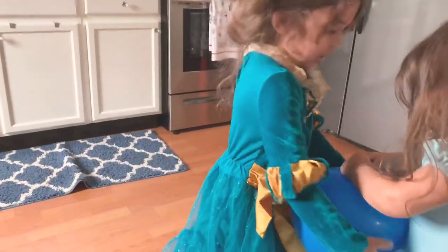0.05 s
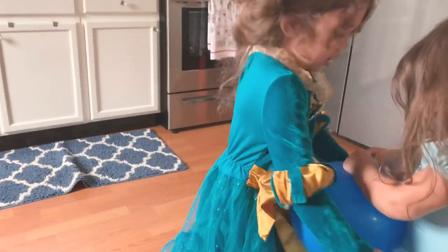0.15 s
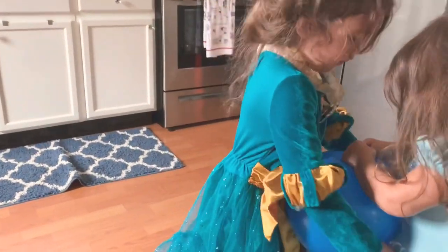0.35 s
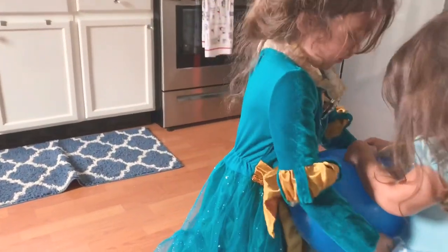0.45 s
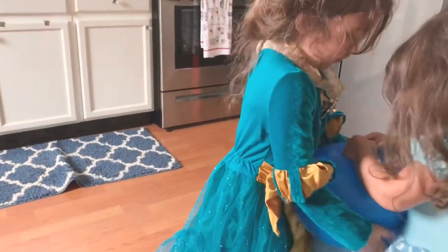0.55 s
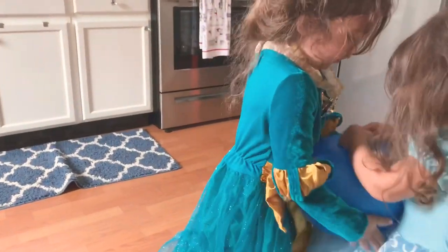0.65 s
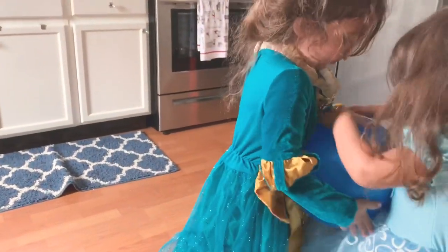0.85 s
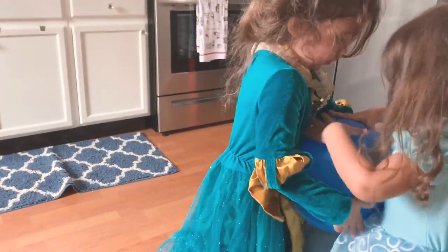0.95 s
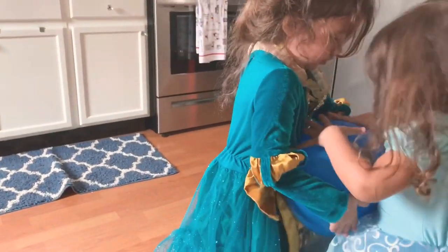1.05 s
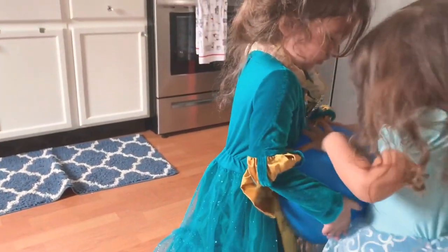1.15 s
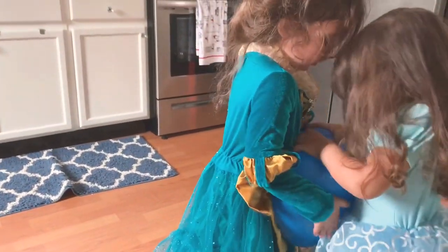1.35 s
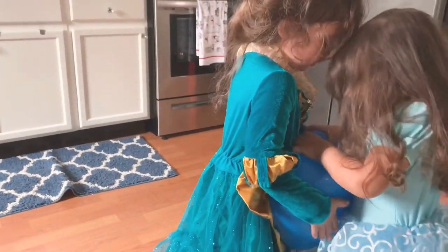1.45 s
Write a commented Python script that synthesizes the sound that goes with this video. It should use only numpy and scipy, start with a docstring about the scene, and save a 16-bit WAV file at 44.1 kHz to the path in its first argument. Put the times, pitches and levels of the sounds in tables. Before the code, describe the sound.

A rubber balloon is squeezed and pushed by hands in a hard kitchen: a strong hollow boom with a stuttering rub early, then sharp snaps, smaller thuds and faint scuffs over rustling cloth, picked up close in stereo.

```python
"""A rubber balloon is squeezed and pushed between hands in a hard kitchen.
Its skin shudders in runs of random slips through skin modes; low modes swell and die as booms;
snaps of rubber letting go and longer scuffs are band-passed noise bursts; noise grains make cloth rustle.
Feet and knees rumble in low noise under a faint hiss; decaying noise tails are the room's answer."""
import sys
import numpy as np
from scipy import signal
from scipy.fft import rfft, irfft, next_fast_len
from scipy.io import wavfile
from scipy.ndimage import map_coordinates

SR = 44100
rng = np.random.default_rng(int(sys.argv[2]) if len(sys.argv) > 2 else 0)


def log_audio(samples):
    """Write samples as a 16-bit WAV file to the path given in sys.argv[1]."""
    # one column per channel
    frames = np.atleast_2d(samples).T
    # limit to full scale, then quantise
    limited = np.clip(frames, -1, 1)
    pcm = np.round(limited * 32767).astype(np.int16)
    wavfile.write(sys.argv[1], SR, pcm)


N = 66150

# hiss spectrum: f/Hz, gain/dB
HISS_SPECTRUM = [(1500, -40), (3000, 0.5), (7400, -22), (8600, -16.5), (9700, 9.5), (16000, -7.5)]
HISS_DB = -65.5

# floor rumble level: t/s, level/dB
RUMBLE_LEVEL = [(0.0, -34), (0.146, -48), (0.304, -33.5), (0.422, -39), (0.576, -41), (0.714, -49),
                (0.934, -42), (1.214, -51.5), (1.5, -49.5)]
# floor rumble spectrum: f/Hz, gain/dB
FLOOR_SPECTRUM = [(15, -62), (25, -8), (76, 2), (97, -3.5), (300, -14), (321, -7), (945, -29.5),
                  (1500, -24), (1950, -23.5), (3300, -120)]

# rustle level: t/s, level/dB
RUSTLE_LEVEL = [(0.0, -36.5), (0.05, -46), (0.1, -47), (0.19, -53), (0.33, -51), (0.44, -53), (0.49, -40),
                (0.56, -49.5), (0.65, -46.5), (0.68, -37), (0.76, -42), (0.83, -45.5), (0.91, -56.5),
                (0.96, -48.5), (1.09, -57), (1.13, -53.5), (1.18, -60.5), (1.23, -52.5), (1.26, -48.5),
                (1.36, -63.5), (1.43, -51), (1.5, -44)]
# rustle spectrum, cloth body down to a deep gap; the last row is not used: f/Hz, gain/dB
RUSTLE_SPECTRUM = [(240, 19), (400, 3.5), (776, 7.5), (899, 9.5), (1130, 4), (3960, 0.5), (7500, 1.5),
                   (9750, -70), (16500, -120)]
# rustle spectrum, top above the gap: f/Hz, gain/dB
RUSTLE_TOP_SPECTRUM = [(10000, 0), (12500, -4.5), (16000, -1.5)]
TOP_SWING = 0.47  # extra dB in the top per dB of rustle level

# snaps of rubber letting go and longer scuffs:
# t/s, peak level/dB, centre f/Hz, decay time constant/s, treble gain/dB
SNAP_AND_SCUFF_EVENTS = [(0.081, -23, 2400, 0.0023, -16), (0.21, -19, 1250, 0.0026, -67),
                         (0.4572, -23.5, 1570, 0.0053, -28), (0.4716, -19, 2240, 0.0019, -17),
                         (0.6623, -8.5, 1560, 0.002, -16), (0.694, -27.5, 3800, 0.013, -39),
                         (0.736, -31, 3630, 0.0089, -35), (0.748, -21.5, 4000, 0.0076, -23),
                         (0.829, -26, 1310, 0.0032, -22), (0.958, -36.5, 4050, 0.0054, -24),
                         (1.022, -36, 2950, 0.01, -8), (1.103, -35, 4300, 0.007, -26),
                         (1.126, -32, 1130, 0.0021, -15), (1.204, -42.5, 2310, 0.001, -21),
                         (1.238, -36.5, 4130, 0.003, -24), (1.2485, -27, 3200, 0.0027, -32),
                         (1.255, -30, 4300, 0.0076, -29), (1.448, -36, 3800, 0.0036, -40),
                         (1.4609, -21.5, 1500, 0.0013, -18), (1.4641, -19.5, 4120, 0.0016, -36)]
# snap and scuff treble resonances: f/Hz, width/Hz, gain/dB
SNAP_TREBLE_MODES = [(4600, 2500, 2), (12500, 8000, 2)]
SNAP_WIDTH_RATIO = 1.2  # bandwidth / centre
SNAP_RISE_RATIO, SNAP_CLICK = 0.3, 3  # rise / decay time constant; first click / grain size

# booms: t/s, level/dB, strongest pitch/octaves over lowest mode, spread/octaves, t60/s, swell/s
BOOM_EVENTS = [(0.0, -33.5, 0, 0.35, 0.2, 0.0036), (0.09, -32, 1.1, 0.27, 0.12, 0.0064),
               (0.2131, -14, 1.3, 0.26, 0.17, 0.002), (0.215, -10.5, 0.2, 0.42, 0.23, 0.0055),
               (0.214, -21, 2.05, 0.33, 0.16, 0.0031), (0.239, -16.5, 1.5, 0.38, 0.24, 0.0039),
               (0.473, -13.5, 0.98, 0.42, 0.098, 0.0038), (0.476, -24.5, 1.66, 0.3, 0.15, 0.0038),
               (0.579, -31, -0.1, 0.48, 0.21, 0.017), (0.663, -26.5, 1.94, 0.53, 0.063, 0.00079),
               (0.666, -20, 0.29, 0.39, 0.1, 0.0036), (0.748, -27, -0.06, 0.27, 0.16, 0.0076),
               (0.826, -19, 0.7, 0.39, 0.058, 0.0013), (0.842, -16, 0.46, 0.42, 0.11, 0.004),
               (0.96, -27.5, 0.82, 0.36, 0.25, 0.0052), (1.033, -38.5, 0.6, 0.7, 0.17, 0.0044),
               (1.118, -32, 0.35, 0.88, 0.15, 0.0036), (1.155, -34, 0.02, 0.24, 0.16, 0.01),
               (1.249, -31.5, 0.5, 0.57, 0.12, 0.0031), (1.462, -28.5, 2, 0.49, 0.068, 0.0012)]
# low balloon modes: f/Hz, level/dB
LOW_BALLOON_MODES = [(98, 7.5), (136, 3), (162, 0), (236, 6), (272, 1.5), (299, 2.5), (360, 0), (430, -4.5)]
MODE_SCATTER_RATIO, MODE_SCATTER_DB = 0.015, 2.5  # pitch, level: standard deviations

# skin shudders: t/s, level/dB, length before release/s, brightness f/Hz
SHUDDER_EVENTS = [(0.0, -42, 0.043, 836), (0.087, -34, 0.0041, 820), (0.2, -29, 0.013, 1310),
                  (0.21, -12, 0.011, 1296), (0.224, -17, 0.039, 823), (0.4686, -28, 0.0063, 1870),
                  (0.476, -24, 0.017, 2020), (0.656, -42, 0.0034, 2440), (0.663, -22.5, 0.0028, 1520),
                  (0.747, -32.5, 0.0064, 864), (0.826, -33, 0.008, 480), (0.839, -30.5, 0.0097, 452),
                  (0.958, -42, 0.0068, 624), (1.019, -41.5, 0.0094, 960), (1.045, -48, 0.0021, 850),
                  (1.104, -44.5, 0.0093, 1310), (1.127, -42, 0.0093, 1100), (1.252, -43.5, 0.018, 1040),
                  (1.459, -35, 0.012, 640)]
# skin modes: f/Hz, level/dB
SKIN_MODES = [(571, -0.5), (680, -7), (800, -3.5), (1030, -4), (1180, -0.5), (1360, 0), (1530, -1.5),
              (1880, -4), (2220, -5.5), (2560, -2.5)]
ATTACK_S, RELEASE_T60_S, SLIPS_PER_S, SLIP_SPREAD_DB = 0.00069, 0.042, 1500, 3.5
RING_DB = 2  # modes over bare slips
SKIN_WIDTH_RATIO, SKIN_DETUNE_RATIO = 0.05, 0.02  # bandwidth / pitch; detuning per grip
LOW_EDGE_RATIO, SOFT_TOP_RATIO = 0.36, 2.39  # edges / brightness
SOFT_TOP_DAMPING = 1.39

# room decay: f/Hz, t60/s
KITCHEN_T60 = [(100, 0.13), (400, 0.34), (1500, 0.27), (4000, 0.28), (12000, 0.082)]
# left-right correlation of room and rumble: f/Hz, likeness/1
STEREO_LIKENESS = [(100, 0.96), (300, 0.96), (700, 0), (1500, 0), (4000, 0.52), (9000, 0.18),
                   (14000, 0.021)]
# phase between ports: f/Hz, left lead/rad
PORT_PHASE = [(0, 0.5), (1000, 0.1), (4500, -1.26), (8000, -3), (12600, -8), (16500, -11)]
# phase between ports for the shudders: f/Hz, left lead/rad
SHUDDER_PORT_PHASE = [(0, 0), (2500, 4), (5000, 11)]
SHUDDER_WET_DB, BOOM_WET_DB, SNAP_WET_DB, CLOTH_WET_DB = -4.5, -9, -7, 1
LEFT_OVER_RIGHT_DB = -0.67
TAIL_REDRAW_S = 0.06  # interval between new echo tails

MIC_LOW_HZ, MIC_TOP_HZ = 54, 16400
CLIP_TOP, CLIP_KNEE = 0.95, 4  # full scale; sharpness


def amp(db):
    """Decibels to amplitude."""
    return 10 ** (np.asarray(db) / 20)


def unit(x):
    """x at unit RMS."""
    return x / np.sqrt(np.mean(x ** 2) + 1e-20)


def along(points, hz):
    """(Hz, value) points interpolated on a log axis."""
    f, v = np.transpose(points)
    return np.interp(np.log(hz + 1), np.log(f + 1), v)


def curve(rows):
    """(s, value) rows interpolated to one value per sample."""
    return np.interp(np.arange(N) / SR, *np.transpose(rows))


def wobble(rate_hz):
    """A smooth random curve with rate_hz knots a second."""
    knots = rng.standard_normal(int(N * rate_hz / SR) + 4)
    return map_coordinates(knots, [np.arange(N) * rate_hz / SR])


def filtered(x, response):
    """x through a complex frequency response, zero-padded."""
    n = x.shape[-1]
    m = next_fast_len(n + SR // 2)
    return irfft(rfft(x, m) * response(np.fft.rfftfreq(m, 1 / SR)), m)[..., :n]


def peak(f, hz, width_hz):
    """Response of a causal resonance with unit gain at hz."""
    return 1j * f * width_hz / (hz * hz - f * f + 1j * f * width_hz)


def pair(x):
    """Two unrelated signals mixed to the stereo likeness of each frequency."""
    def mid_side_gains(hz):
        angle = np.arccos(np.clip(along(STEREO_LIKENESS, hz), -1, 1)) / 2
        return np.array([np.cos(angle), np.sin(angle)])

    mid, side = filtered(x, mid_side_gains)
    return np.array([mid + side, mid - side])


def add(track, t_s, x):
    """Adds x to the track at t_s."""
    i = max(round(t_s * SR), 0)
    track[i:i + len(x)] += x[:N - i]


def kitchen(x, wet_db, port_phase):
    """Echo tails decay per frequency, redrawn at regular intervals; two ports differ in phase and level."""
    hop = round(TAIL_REDRAW_S * SR)
    pieces = np.pad(x, (200, -(N + 200) % hop)).reshape(-1, 1, hop)  # 200 samples of echo delay
    noise = rng.standard_normal((len(pieces), 2, SR // 3))
    hz, t, z = signal.stft(noise, SR, nperseg=256)
    decay = amp(-60 * t / along(KITCHEN_T60, hz)[:, None])
    tails = signal.istft(z * decay, SR, nperseg=256)[1]
    tails = tails / np.linalg.norm(tails, axis=2, keepdims=True)
    wet = np.zeros((2, N))
    for k, echo in enumerate(signal.fftconvolve(pieces, tails, axes=2)):
        add(wet.T, k * hop / SR, echo.T)
    side = np.array([[0.5], [-0.5]])  # left, right

    def ports(f):
        lead_rad = np.interp(f, *np.transpose(port_phase))
        return amp(LEFT_OVER_RIGHT_DB * side) * np.exp(1j * lead_rad * side)

    return filtered(x + amp(wet_db) * pair(wet), ports)


def hiss():
    """Steady noise, shaped to a faint treble hiss."""
    noise = rng.standard_normal(N)
    return amp(HISS_DB) * unit(filtered(noise, lambda hz: amp(along(HISS_SPECTRUM, hz))))


def rumble():
    """Feet and knees shifting on the floor: low noise with a lumpy level."""
    noise = pair(rng.standard_normal((2, N)))
    low = unit(filtered(noise, lambda hz: amp(along(FLOOR_SPECTRUM, hz))))
    return amp(curve(RUMBLE_LEVEL) + 4.1 * wobble(25.17)) * low


def rustle():
    """Dense fine grains of cloth on rubber, in clumps; the top swings more than the body."""
    grains = rng.standard_normal(N) * amp(3.0 * wobble(1500) + 1.53 * wobble(59.83))
    spectrum = RUSTLE_SPECTRUM[:-1] + RUSTLE_TOP_SPECTRUM
    shaped = unit(filtered(grains, lambda hz: amp(along(spectrum, hz))))
    top = filtered(shaped, lambda hz: hz > RUSTLE_SPECTRUM[-2][0])  # above the gap
    body = shaped - top
    level_db = curve(RUSTLE_LEVEL)
    swing = amp(TOP_SWING * (level_db - level_db.mean()))
    return amp(level_db) * (body + top * swing)


def snaps_and_scuffs():
    """Rubber letting go or scuffing: a click and a noise burst around one centre, with a treble part."""
    out, t = np.zeros(N), np.arange(SR // 20) / SR

    def treble(f):
        return sum((-1) ** k * amp(db) * peak(f, hz, width_hz)
                   for k, (hz, width_hz, db) in enumerate(SNAP_TREBLE_MODES))

    for t_s, db, hz, decay_s, treble_db in SNAP_AND_SCUFF_EVENTS:
        envelope = (1 - np.exp(-t / (SNAP_RISE_RATIO * decay_s))) * np.exp(-t / decay_s)
        burst = rng.standard_normal((2, len(t))) * envelope + SNAP_CLICK * (t == 0)
        bands = lambda f: np.array([peak(f, hz, SNAP_WIDTH_RATIO * hz) ** 2, amp(treble_db) * treble(f)])
        crack = filtered(burst, bands).sum(axis=0)
        add(out, t_s, amp(db) * crack / np.abs(crack).max())
    return out


def booms():
    """Each push swells and dies in the low balloon modes near its strongest pitch."""
    out, t = np.zeros(N), np.arange(SR // 2) / SR
    hz, mode_db = np.transpose(LOW_BALLOON_MODES)[:, :, None]
    octaves = np.log2(hz / hz[0])
    for t_s, db, centre_oct, spread_oct, t60_s, swell_s in BOOM_EVENTS:
        level_draw, pitch_draw = rng.standard_normal((2, len(hz), 1))
        near = np.exp(-((octaves - centre_oct) / spread_oct) ** 2)
        share = near * amp(mode_db + MODE_SCATTER_DB * level_draw)
        mode_hz = hz * (1 + MODE_SCATTER_RATIO * pitch_draw)
        ring = (share * np.sin(2 * np.pi * mode_hz * t)).sum(axis=0)
        envelope = amp(db - 60 * t / t60_s) * (1 - np.exp(-t / swell_s)) ** 2
        add(out, t_s, envelope * ring)
    return out


def shudders():
    """Runs of uneven slip impulses, dulled by the soft contact, drum the skin modes."""
    out, t = np.zeros(N), np.arange(SR // 2) / SR
    for t_s, db, length_s, bright_hz in SHUDDER_EVENTS:
        release = amp(-60 * np.clip(t - length_s, 0, 1) / RELEASE_T60_S)
        shape = np.clip(t / ATTACK_S, 0, 1) * release
        grip = 1 + SKIN_DETUNE_RATIO * rng.standard_normal(len(SKIN_MODES))
        draw, size = rng.random(len(t)), rng.standard_normal(len(t))
        slip_now = draw < SLIPS_PER_S / SR
        slips = shape * slip_now * amp(SLIP_SPREAD_DB * np.abs(size)) * np.sign(size)

        def skin(f):
            ring = sum(amp(level) * peak(f, hz * g, SKIN_WIDTH_RATIO * hz)
                       for g, (hz, level) in zip(grip, SKIN_MODES))
            low_cut = (1j * f / (LOW_EDGE_RATIO * bright_hz + 1j * f)) ** 2
            u = f / (SOFT_TOP_RATIO * bright_hz)
            soft_contact = 1 / (1 - u ** 2 + 1j * SOFT_TOP_DAMPING * u) ** 2
            return (1 + amp(RING_DB) * ring) * low_cut * soft_contact / (1 + 1j * f / bright_hz) ** 2

        shape_rms = np.linalg.norm(shape) / np.sqrt(len(t))
        add(out, t_s, amp(db) * unit(filtered(slips, skin)) * shape_rms)
    return out


def scene():
    """Sums the sources; all but the rumble pass through the kitchen."""
    return (kitchen(shudders(), SHUDDER_WET_DB, SHUDDER_PORT_PHASE)
            + kitchen(booms(), BOOM_WET_DB, PORT_PHASE)
            + rumble()
            + kitchen(snaps_and_scuffs(), SNAP_WET_DB, PORT_PHASE)
            + kitchen(rustle() + hiss(), CLOTH_WET_DB, PORT_PHASE))


def record(dry):
    """The microphone loses deep bass, rounds off the highest peaks and stops at its band limit."""
    x = filtered(dry, lambda hz: (1j * hz / (MIC_LOW_HZ + 1j * hz)) ** 2)
    rounded = x / (1 + np.abs(x / CLIP_TOP) ** CLIP_KNEE) ** (1 / CLIP_KNEE)
    return filtered(rounded, lambda hz: hz < MIC_TOP_HZ)


dry = scene()
out = record(dry)
log_audio(out)
```